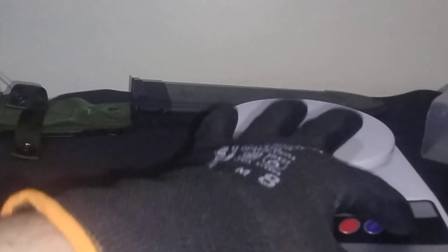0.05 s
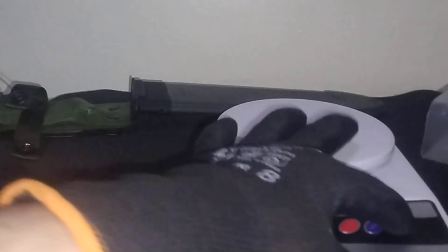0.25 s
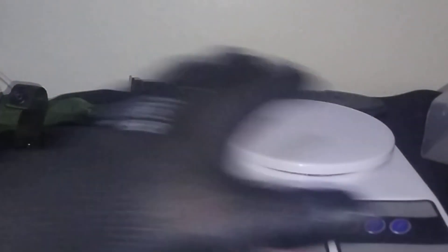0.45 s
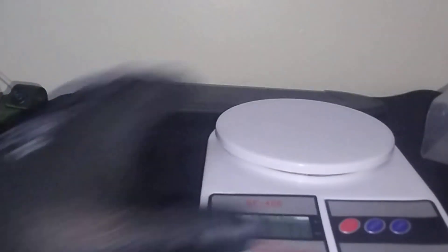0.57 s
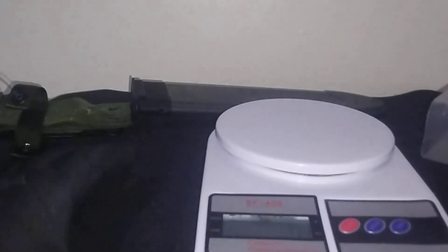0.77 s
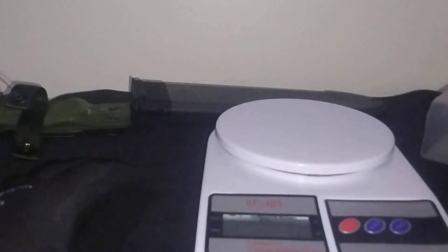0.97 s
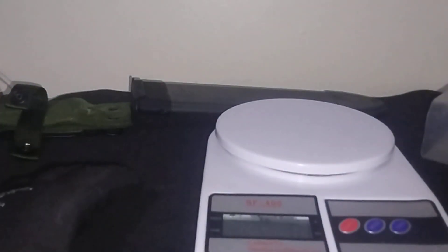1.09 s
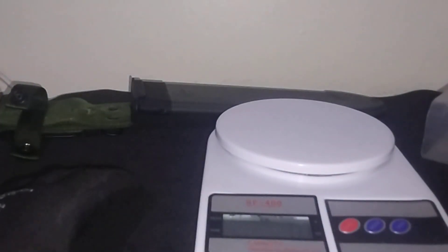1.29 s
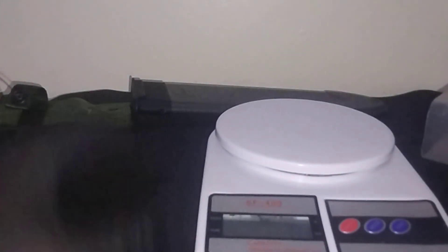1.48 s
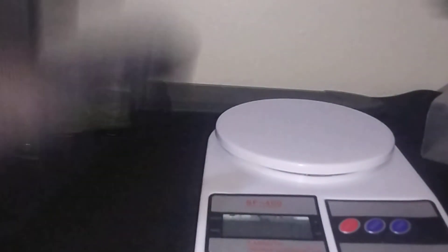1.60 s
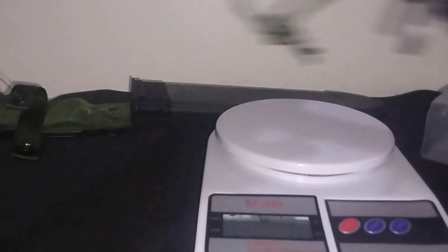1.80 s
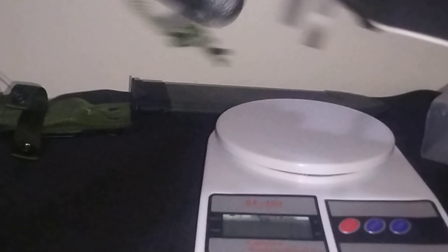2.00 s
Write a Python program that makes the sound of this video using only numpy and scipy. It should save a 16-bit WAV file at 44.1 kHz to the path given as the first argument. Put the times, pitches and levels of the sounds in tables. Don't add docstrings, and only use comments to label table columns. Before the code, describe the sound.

Close to a small camera microphone with little treble, a gloved hand knocks hollow plastic twice with a short room tail, then quiet motor hum, a soft fabric rub and a tiny final tick.

```python
import sys
import numpy as np
from scipy import signal
from scipy.fft import rfft, irfft, next_fast_len
from scipy.io import wavfile
from scipy.ndimage import map_coordinates

SR = 44100
rng = np.random.default_rng(int(sys.argv[2]) if len(sys.argv) > 2 else 0)


def level_to_linear(level):
    exponent = np.asarray(level, float) / 20
    return 10 ** exponent


def master(y):
    cut = np.clip(np.atleast_2d(y).T, -1, 1)
    pcm = np.round(cut * 32767)
    wavfile.write(sys.argv[1], SR, pcm.astype(np.int16))


N = 90404


def unit(x):
    return x / np.sqrt(np.mean(x ** 2) + 1e-20)


def along(points, hz):
    f, v = np.transpose(points)
    return np.interp(np.log(hz + 1), np.log(f + 1), v)


def level(rows):
    return level_to_linear(np.interp(np.arange(N) / SR, *np.transpose(rows)))


def since(s):
    return np.maximum(np.arange(N) / SR - s, 0)


def wobble(rate_hz):
    knots = rng.standard_normal(int(N * rate_hz / SR) + 4)
    return map_coordinates(knots, [np.arange(N) * rate_hz / SR])


def filtered(x, response):
    m = next_fast_len(N + SR // 2)
    return irfft(rfft(x, m) * response(np.fft.rfftfreq(m, 1 / SR)), m)[:N]


def peak(f, hz, width_hz):
    return 1j * f * width_hz / (hz * hz - f * f + 1j * f * width_hz)


def noise(spectrum):
    return unit(filtered(rng.standard_normal(N), lambda f: level_to_linear(along(spectrum, f))))


def narrow(hz, width_hz):
    return unit(filtered(rng.standard_normal(N), lambda f: peak(f, hz, width_hz) ** 2))


# f/Hz, density/dB
RUMBLE_SPECTRUM = [(1.8, -34), (3.0, -1.5), (16, -4), (86, -24.5), (100, -22.5), (130, -35.5), (220, -120)]


def rumble():
    return level_to_linear(-51) * noise(RUMBLE_SPECTRUM)


# f/Hz, density/dB
AIR_SPECTRUM = [(88, -19), (150, -2), (171, -7.5), (597, -14), (671, -19.5), (1030, -13.5), (1670, -22.5),
                (6890, -26.5), (8000, -19), (10400, -58), (17600, -120)]


def air():
    return level_to_linear(-63.5 + 0.66 * wobble(4.07)) * noise(AIR_SPECTRUM)


# f/Hz, rms level/dB, wander/dB
HUM_TONES = [(59.5, -72, 1), (119.7, -60, 1.5), (238, -76, 2), (358, -83, 2), (480, -83, 2), (599, -78, 4),
             (2280, -89, 3), (2867, -89, 3)]


def hum(turns_s):
    total = 0
    for hz, db, wander_db in HUM_TONES:
        gain = np.sqrt(2) * level_to_linear(db + wander_db * wobble(9))
        total = total + gain * np.sin(2 * np.pi * (hz * turns_s + rng.random()))
    return total


# t/s, level/dB
WHISTLE_LEVEL = [(0.7, -84), (0.842, -93), (0.864, -76.5), (1.228, -100), (1.304, -78.5), (1.458, -81.5),
                 (1.514, -100), (1.54, -88), (1.806, -74.5), (1.934, -100), (1.968, -80), (2.05, -83)]


def whistle(turns_s):
    hz = 2519
    return np.sqrt(2) * level(WHISTLE_LEVEL) * np.sin(2 * np.pi * hz * turns_s)


# f/Hz, width/Hz, level/dB
HOUSING_MODES = [(872, 27, -86), (983, 36, -78), (1152, 27, -79), (1225, 31, -79.5), (1315, 50, -82),
                 (1379, 42, -81.5), (1469, 58, -82), (270, 33, -75), (694, 63, -81.5)]


def murmur():
    return sum(level_to_linear(db + 2.5 * wobble(7.06)) * narrow(hz, width_hz) for hz, width_hz, db in HOUSING_MODES)


# t/s, level/dB
WHINE_LEVEL = [(0.62, -73), (0.722, -65.5), (0.878, -76.5), (0.89, -93), (0.914, -78), (1.092, -70),
               (1.128, -62), (1.264, -90), (1.276, -79), (1.426, -93), (1.45, -70.5), (1.776, -67.5),
               (1.804, -94), (1.828, -79), (1.852, -89), (1.908, -97), (1.964, -61), (2.05, -62.5)]


def whine():
    centre_hz, wander_hz, rough_db = 1043, 14.15, -6
    hz = centre_hz + wander_hz * wobble(40)
    tone = np.sqrt(2) * level_to_linear(2.7 * wobble(60)) * np.sin(2 * np.pi * np.cumsum(hz) / SR)
    return level(WHINE_LEVEL) * unit(tone + level_to_linear(rough_db) * narrow(centre_hz, 67))


def fan():
    drift = .0012
    turns_s = np.cumsum(1 + drift * wobble(5.4)) / SR
    return rumble() + air() + hum(turns_s) + whistle(turns_s) + murmur() + whine()


SWELL_S = .0011


def knock(t, push):
    hz, t60_s = 1400, .002
    rise = np.sin(np.pi / 2 * t / SWELL_S)
    fall = level_to_linear(-60 * (t - SWELL_S) / t60_s)
    return push * np.where(t < SWELL_S, rise, fall) * np.cos(2 * np.pi * hz * (t - SWELL_S))


# f/Hz, width/Hz, level/dB
CASE_FIRST = [(700, 87, 12), (1100, 100, 0), (1590, 110, -34), (2110, 80, -27.5), (2710, 73, -8),
              (3210, 110, -19)]
# f/Hz, width/Hz, level/dB
CASE_SECOND = [(715, 81, 8.5), (1167, 110, -18), (1530, 150, -28), (1820, 180, -13), (2220, 100, 1.5),
               (3500, 68, -3)]


def case_ring(t, push, case):
    ring_db, thud_hz, thud_width_hz, thud_db = -6, 380, 300, 0
    blow = push * np.exp(-((t - SWELL_S) / .00006) ** 2)

    def modes(f):
        thud = level_to_linear(thud_db) * peak(f, thud_hz, thud_width_hz)
        return sum(level_to_linear(db) * peak(f, hz, width_hz) for hz, width_hz, db in case) + thud

    ring = filtered(blow, modes)
    return level_to_linear(ring_db) * ring / np.abs(ring).max()


# f/Hz, density/dB
CRACK_FIRST = [(1290, -43), (2200, -0.5), (3090, -3), (3720, -25), (4660, -5.5), (5940, -11), (6380, -20.5),
               (6990, -8.5), (8000, -18), (10400, -52), (17600, -120)]
# f/Hz, density/dB
CRACK_SECOND = [(1290, -35), (2200, 0), (2870, -1.5), (3440, -13), (4030, -13), (4540, -10.5), (5110, -17),
                (6840, -27), (8000, -30), (10400, -61), (17600, -120)]


def crack(t, crack_db, spectrum):
    t60_s, rise_s = .022, .00039
    return level_to_linear(crack_db - 60 * t / t60_s) * (1 - np.exp(-t / rise_s)) * noise(spectrum)


# delay/s, level/dB, top f/Hz
NEAR_ECHOES = [(.0027, -4, 1110), (.0068, -19, 1500), (.0100, -10, 1204), (0.01, -20, 2000),
               (0.0148, -17.5, 3000), (0.0158, -13.5, 2540), (0.016, -19.5, 2500)]


def near_echoes(direct, stretch):
    def walls(f):
        total = 0
        for delay_s, db, top_hz in NEAR_ECHOES:
            delay = np.exp(-2j * np.pi * f * delay_s * stretch)
            total = total + level_to_linear(db) * delay / (1 + 1j * f / top_hz)
        return total

    return filtered(direct, walls)


# f/Hz, density/dB
FAR_WALL_SPECTRUM = [(2000, -27), (2800, -7), (4000, -1), (5000, 7), (7000, -5), (9000, -7)]


def far_wall(t, stretch):
    delay_s, spread_s, db = .0155, .0025, -31.5
    window = np.exp(-((t - delay_s * stretch) / spread_s) ** 4)
    return level_to_linear(db) * window * noise(FAR_WALL_SPECTRUM)


# f/Hz, t60/s
ROOM_T60 = [(120, 0.41), (400, 0.19), (1000, 0.21), (2700, 0.29), (7500, 0.2)]
# f/Hz, level/dB
TAIL_COLOUR = [(100, -8.5), (300, -6), (520, -0.5), (750, 7), (1600, -2.5), (2300, -14.5), (4000, -21.5),
               (7500, -22)]


def room(s, longer, extra_db):
    start_s, late_db, late_longer = .0017, -18, 3.34
    hz, t, z = signal.stft(rng.standard_normal(SR), SR, nperseg=256)
    fall_db = -60 * t / longer / along(ROOM_T60, hz)[:, None]
    bump_db = extra_db * np.exp(-np.log((hz + 1) / 1800) ** 2 / 0.056)
    colour = level_to_linear(along(TAIL_COLOUR, hz) + bump_db)[:, None]
    decay = level_to_linear(fall_db) + level_to_linear(late_db + fall_db / late_longer)
    tail = signal.istft(z * colour * decay, SR, nperseg=256)[1]
    tail = tail * (1 - np.exp(-np.arange(len(tail)) / SR / start_s))
    return np.pad(tail / np.abs(tail).max(), (round((s + SWELL_S) * SR), N))[:N]


def boom(t, longer):
    hz, width_hz, db, t60_s, rise_s = 141.8, 40, -28, .33, .006
    return level_to_linear(db - 60 * t / t60_s / longer) * (1 - np.exp(-t / rise_s)) * narrow(hz, width_hz)


def rap(s, db, push, crack_db, room_db, longer, stretch, extra_db, case, crack_spectrum):
    t = since(s)
    direct = knock(t, push) + case_ring(t, push, case) + crack(t, crack_db, crack_spectrum)
    tail = level_to_linear(room_db) * room(s, longer, extra_db)
    return level_to_linear(db) * (direct + near_echoes(direct, stretch) + tail + far_wall(t, stretch) + boom(t, longer))


# t/s, peak level/dB, push direction
RAP_EVENTS = [
    (.2224, -9, 1),
    (.3954, -13.3, -1),
    (.39655, -21, -1),
]
# crack level/dB, room level/dB, room length factor, echo stretch, extra at 1.8 kHz/dB
RAP_SPOTS = [
    (-16, -11.5, 1.136, 0.9, 0),
    (-18, -9.5, 1.05, 1.06, 4),
    (-21, -15.5, 1.26, 1.06, 2),
]


def raps():
    cases = CASE_FIRST, CASE_SECOND, CASE_SECOND
    cracks = CRACK_FIRST, CRACK_SECOND, CRACK_SECOND
    blows = zip(RAP_EVENTS, RAP_SPOTS, cases, cracks)
    return sum(rap(*event, *spot, case, spectrum) for event, spot, case, spectrum in blows)


# t/s, rise/s, fall/s, level/dB
RUSTLE_EVENTS = [
    (.872, .008, 0.039, -62),
    (1.53, .012, 0.04, -63),
    (1.568, 0.015, 0.018, -55),
    (2.012, .01, 0.0092, -65.5),
]
# f/Hz, density/dB
CLOTH_SPECTRUM = [(600, -22), (1700, 2.5), (2300, -10), (3000, -4), (4600, -3.5), (5300, -9), (6000, -5),
                  (7500, -2.5)]


def cloth():
    t = np.arange(N) / SR
    swell = 0
    for s, rise_s, fall_s, db in RUSTLE_EVENTS:
        swell = swell + level_to_linear(db) * np.exp(-np.where(t < s, (s - t) / rise_s, (t - s) / fall_s))
    return swell * unit(level_to_linear(2.5 * wobble(300)) * noise(CLOTH_SPECTRUM))


# t/s, level/dB, f/Hz
TICK_EVENTS = [
    (2.0105, -48, 870),
    (2.0115, -63, 3600),
    (1.941, -63, 2100),
]


def ticks():
    t60_s, rise_s = .03, .001
    total = 0
    for s, db, hz in TICK_EVENTS:
        t = since(s)
        total = total + level_to_linear(db - 60 * t / t60_s) * (1 - np.exp(-t / rise_s)) * np.sin(2 * np.pi * hz * t)
    return total


def scene():
    return (fan() + raps() + cloth() + ticks())[None]


def low_pass(x):
    return signal.sosfilt(signal.butter(12, 8510, fs=SR, output="sos"), x)


# f/Hz, gain/dB
BAND_LIMIT = [(7300, 1), (7900, -11), (8400, -28.5), (8700, -61), (9200, -70)]


def record(dry):
    limited = filtered(dry[0], lambda f: level_to_linear(along(BAND_LIMIT, f)))
    hiss = level_to_linear(-92.5) * rng.standard_normal(N)
    return low_pass((limited + hiss)[None])


dry = scene()
out = record(dry)
master(out)
```